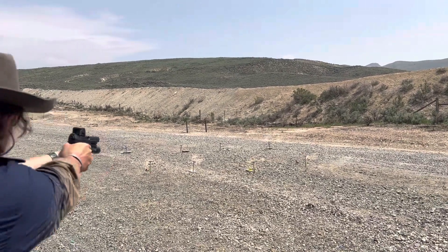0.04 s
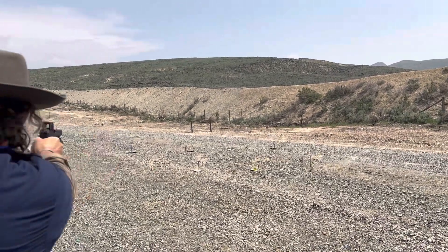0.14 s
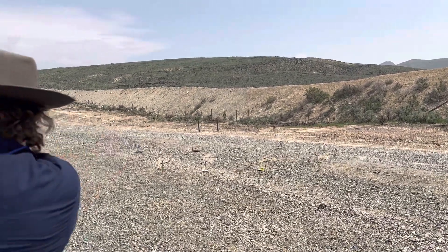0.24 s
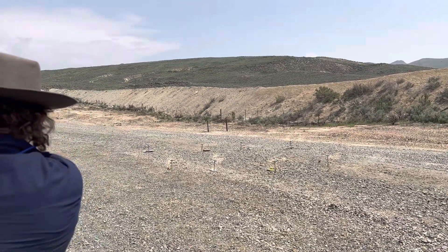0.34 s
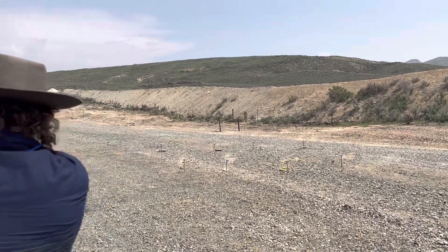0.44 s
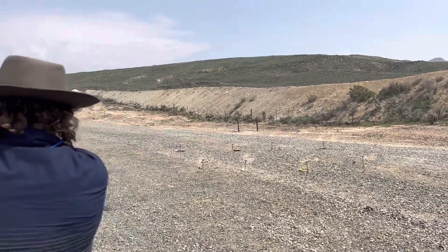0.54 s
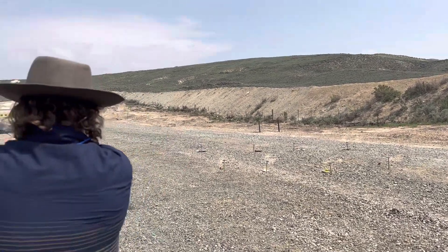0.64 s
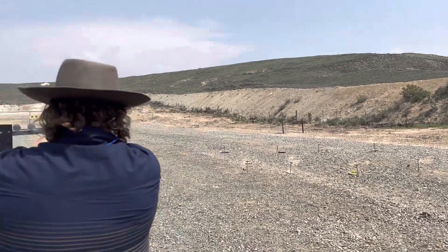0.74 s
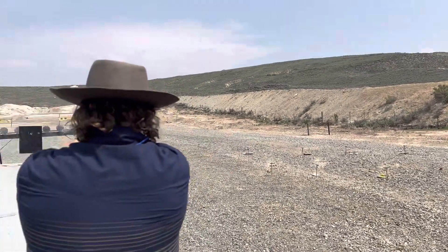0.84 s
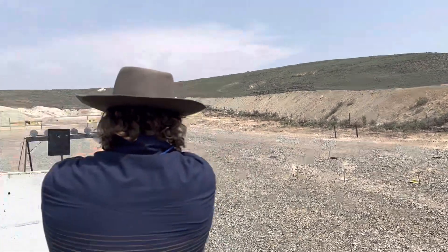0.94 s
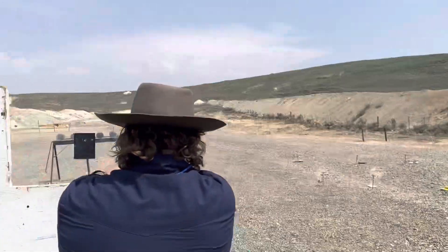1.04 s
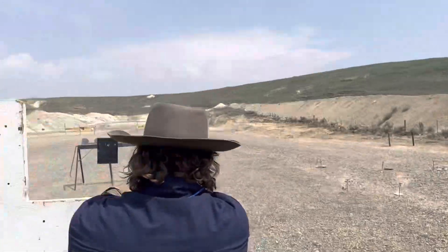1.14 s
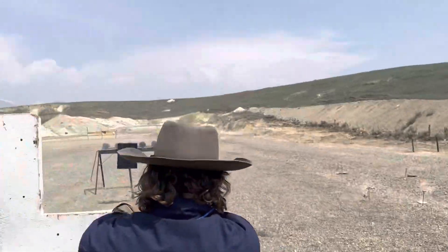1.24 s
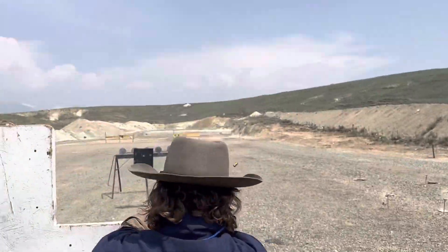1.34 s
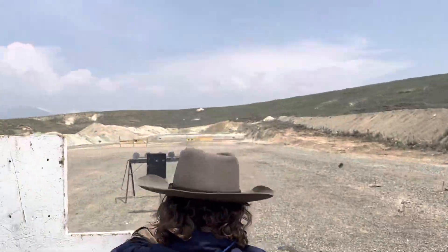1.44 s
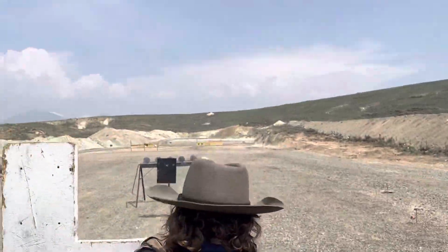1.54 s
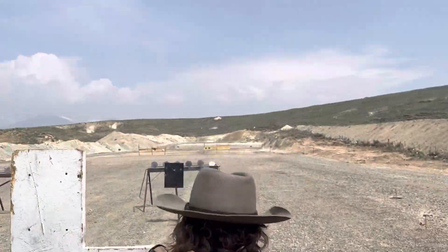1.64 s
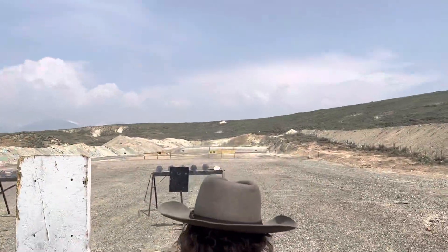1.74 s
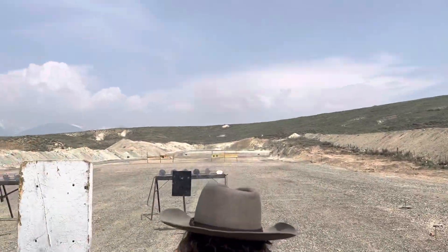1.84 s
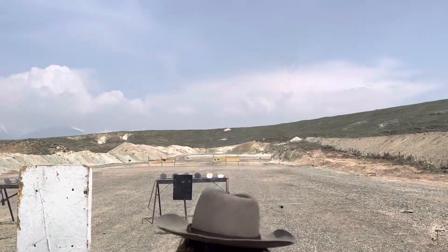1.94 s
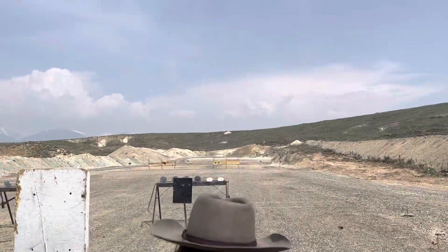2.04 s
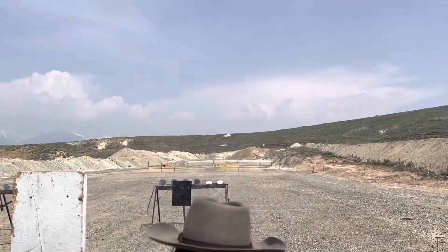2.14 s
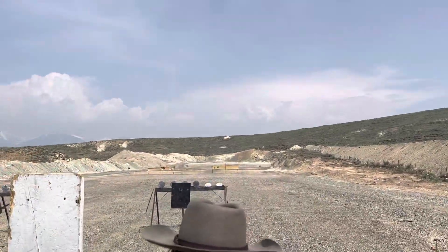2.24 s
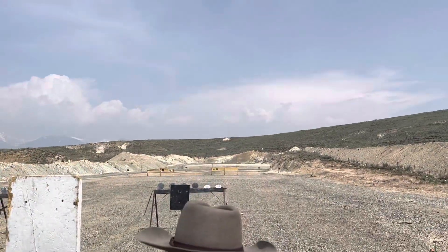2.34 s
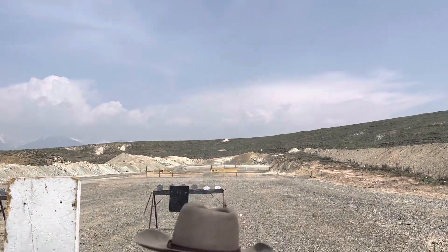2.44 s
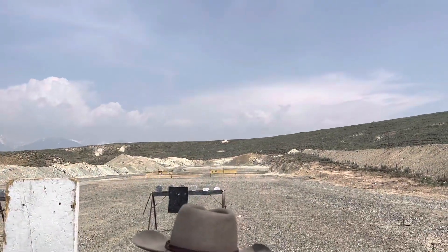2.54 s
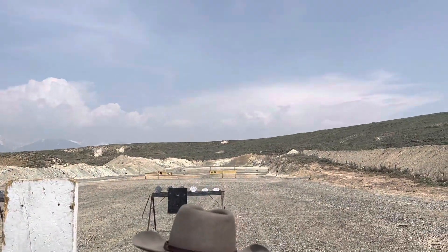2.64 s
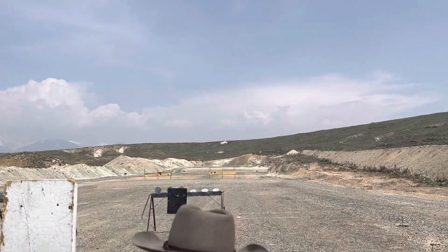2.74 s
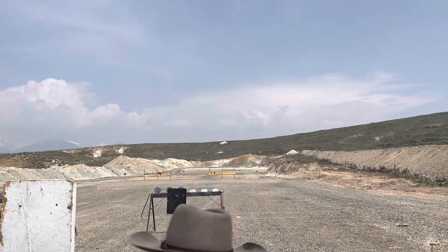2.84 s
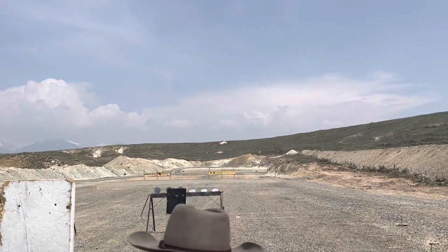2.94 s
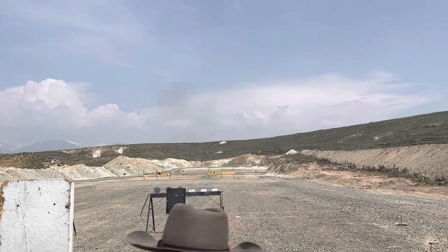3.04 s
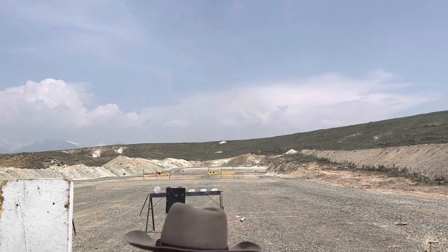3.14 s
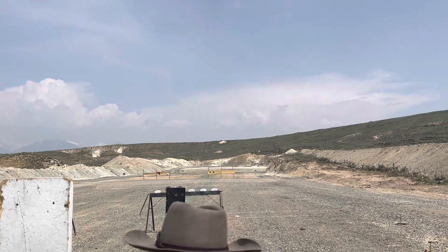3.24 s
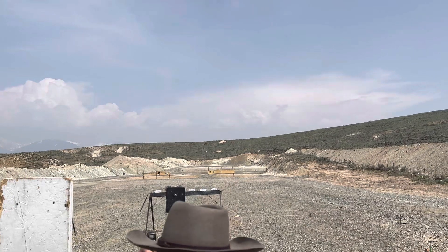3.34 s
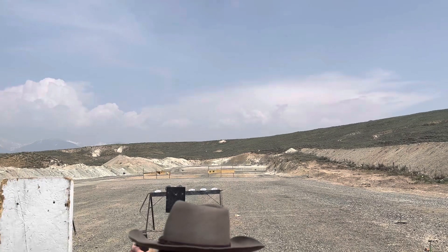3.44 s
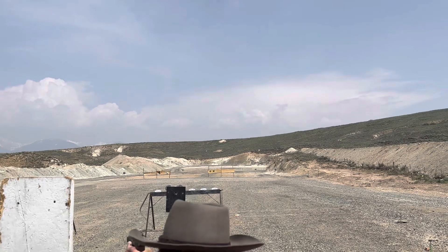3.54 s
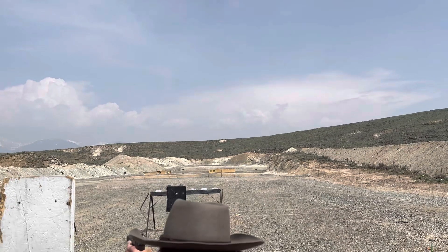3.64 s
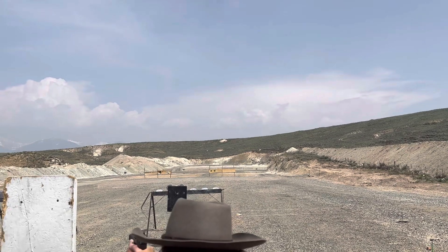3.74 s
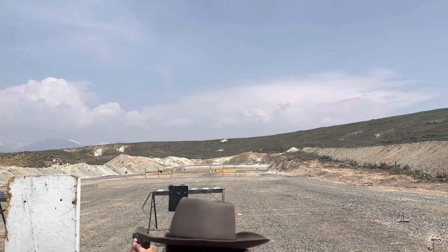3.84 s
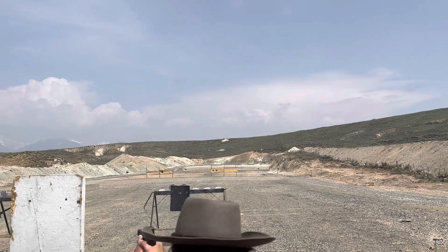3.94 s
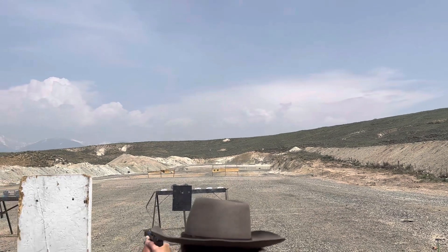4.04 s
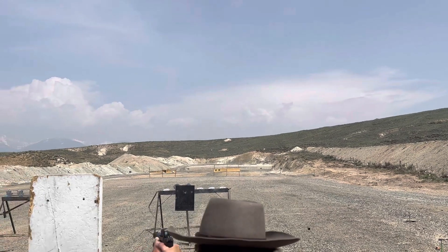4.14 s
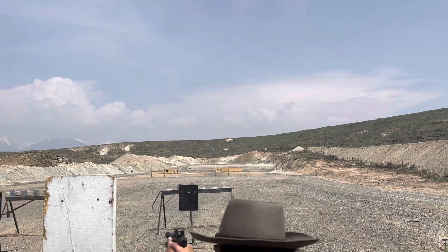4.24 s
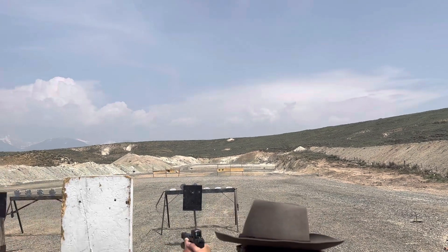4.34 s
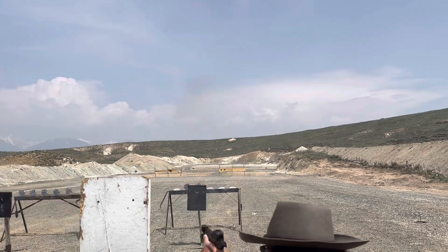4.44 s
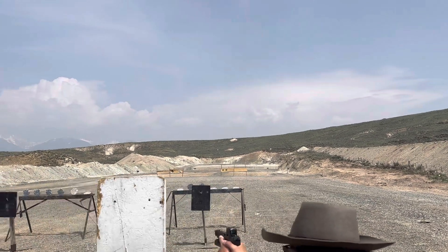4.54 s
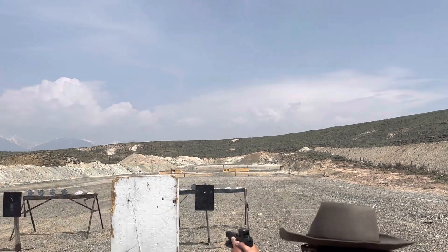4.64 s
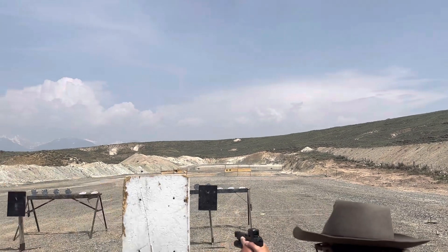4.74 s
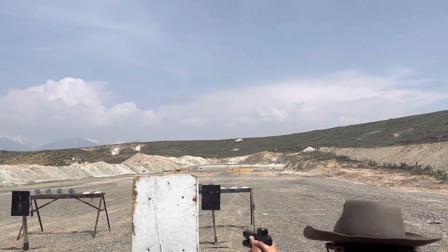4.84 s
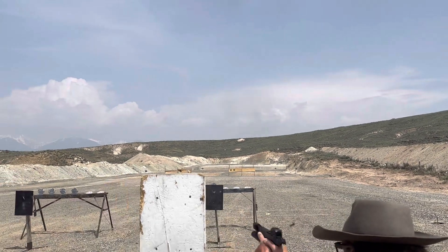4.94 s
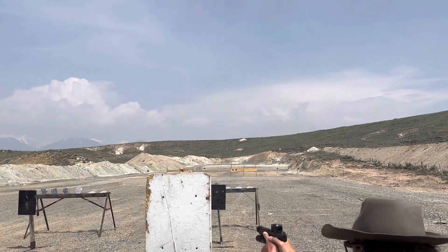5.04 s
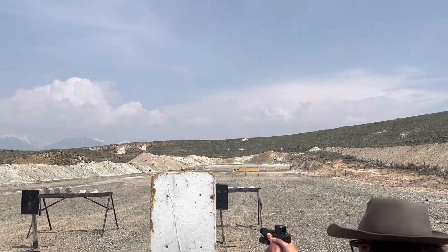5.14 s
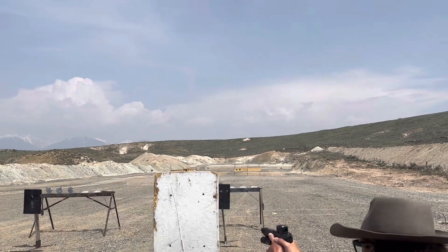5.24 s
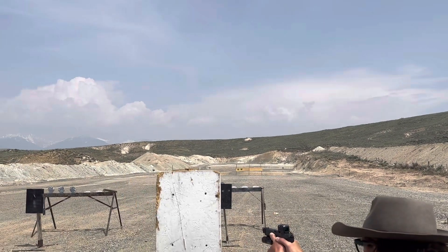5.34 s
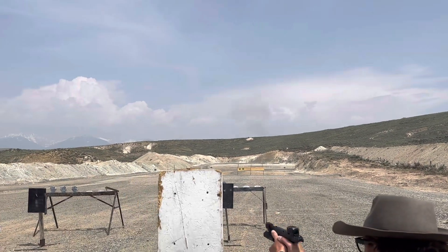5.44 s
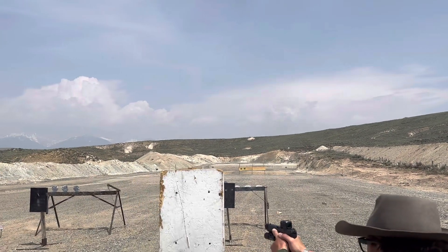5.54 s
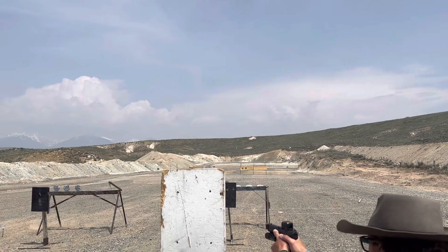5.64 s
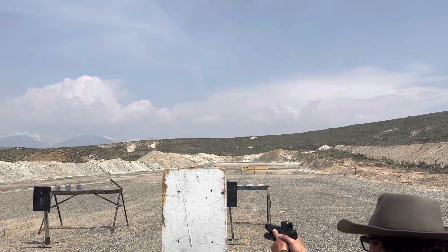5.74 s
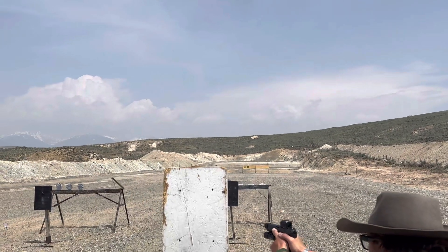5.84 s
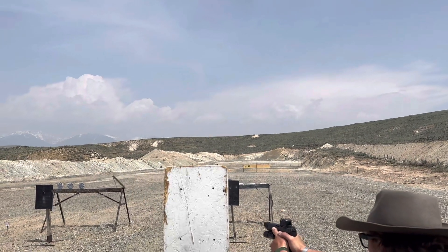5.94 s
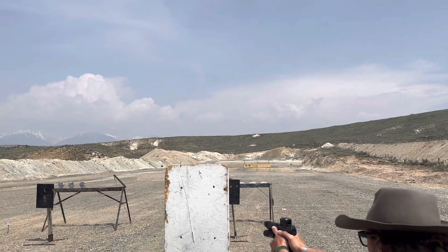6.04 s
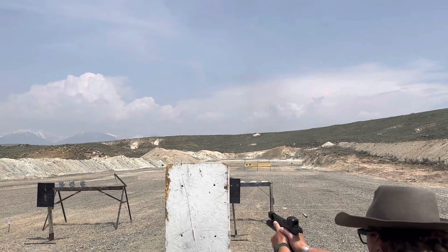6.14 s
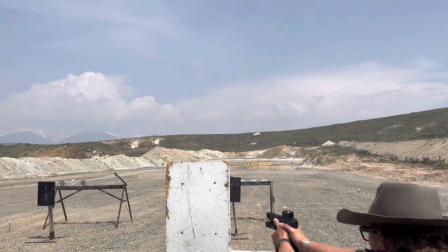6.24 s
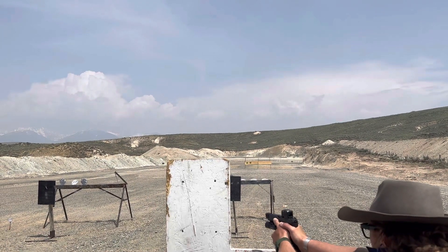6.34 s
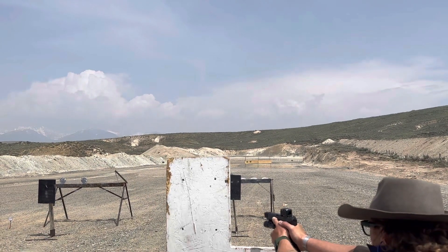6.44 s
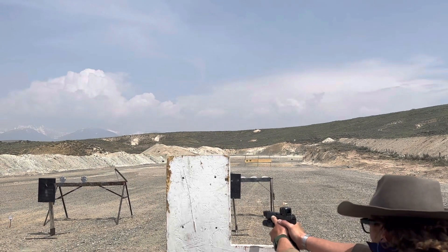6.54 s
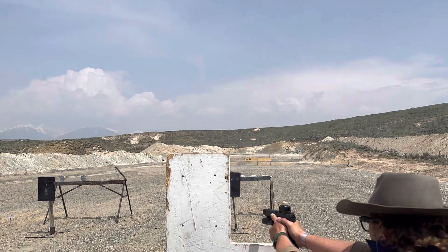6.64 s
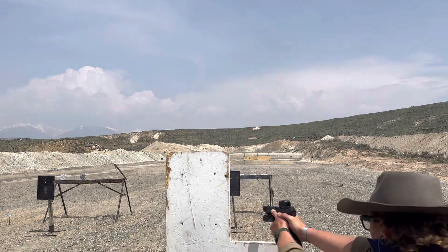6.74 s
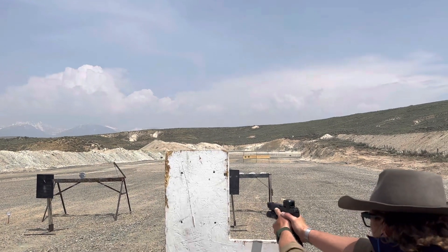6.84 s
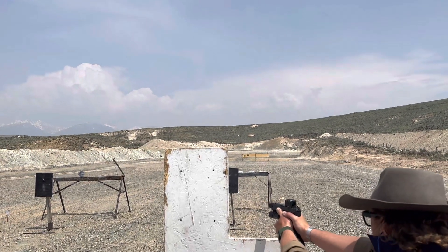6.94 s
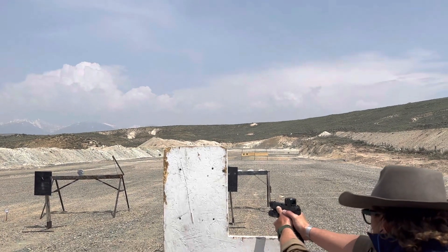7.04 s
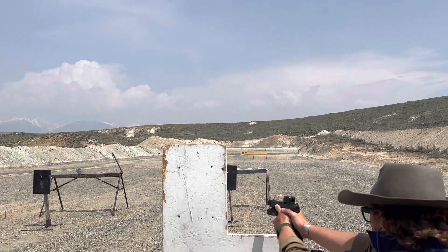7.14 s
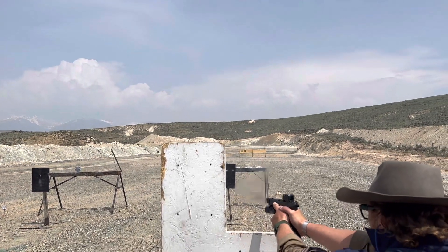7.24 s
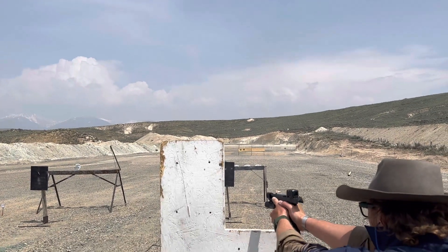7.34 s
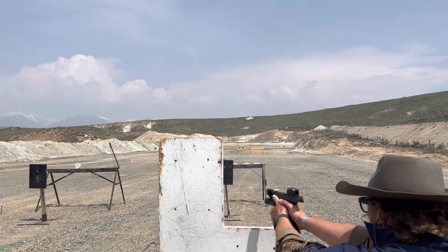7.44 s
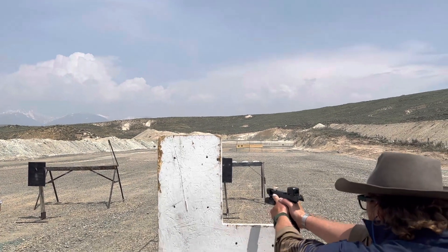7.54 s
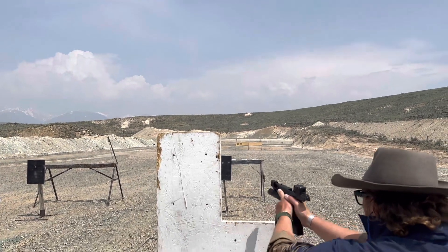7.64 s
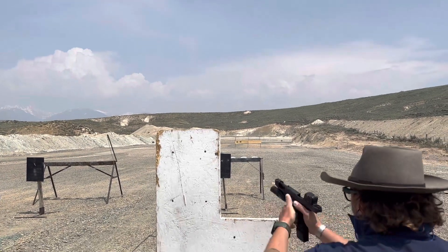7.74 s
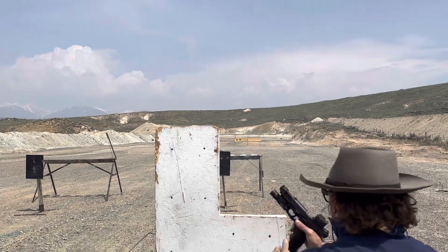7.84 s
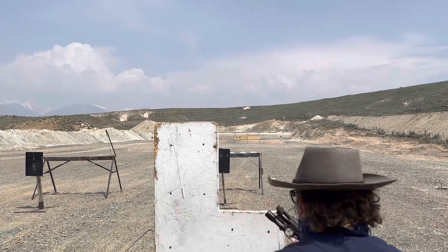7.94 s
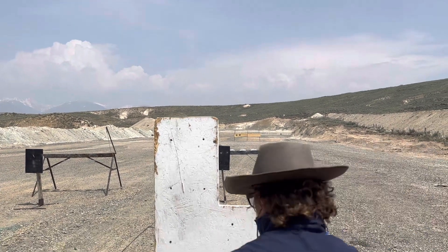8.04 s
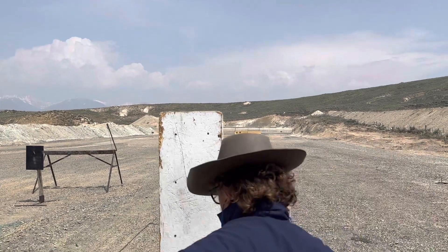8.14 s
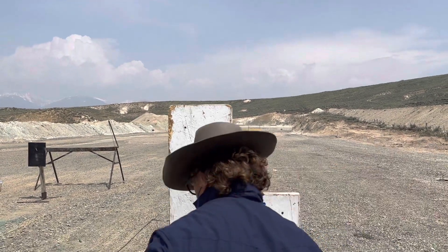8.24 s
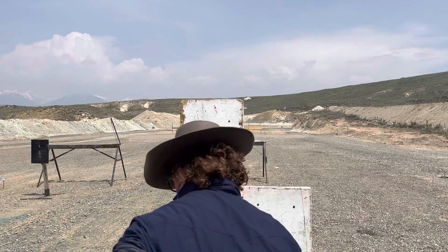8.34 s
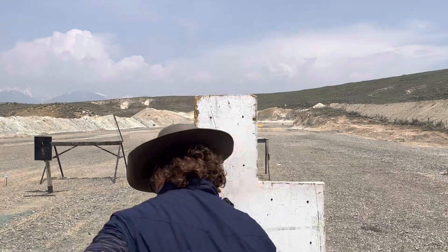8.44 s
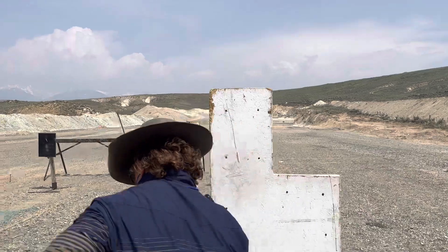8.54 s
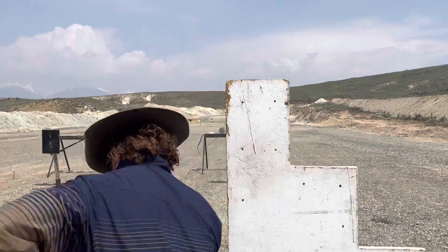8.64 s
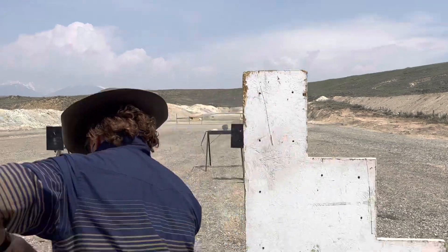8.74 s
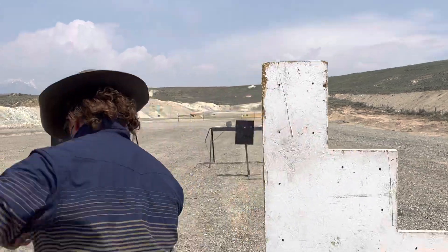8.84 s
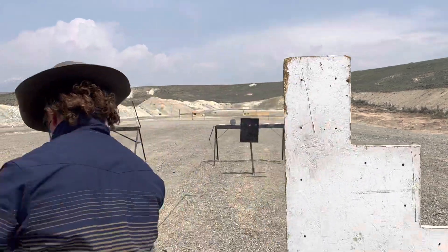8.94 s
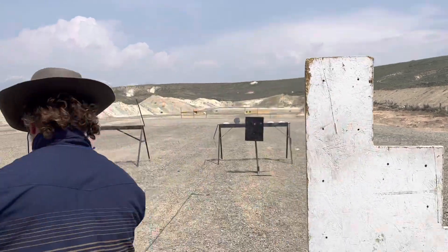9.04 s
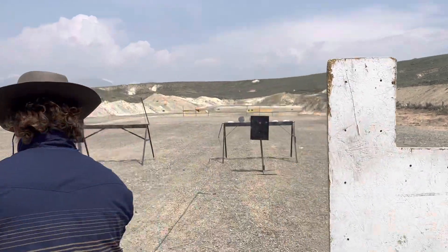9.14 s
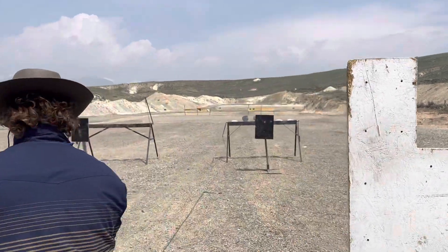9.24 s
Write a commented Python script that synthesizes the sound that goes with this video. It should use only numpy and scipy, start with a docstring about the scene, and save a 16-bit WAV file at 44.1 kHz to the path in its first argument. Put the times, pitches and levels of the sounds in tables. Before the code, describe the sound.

Eleven spaced pistol shots crack across an open gravel range, each answered by a steel plate's bright ping and dull echoes, then gravel footsteps in wind.

```python
"""A pistol fires eleven times on an open gravel range: filtered pulses and gas noise, then a decaying noise tail.
Earth banks and racks return each blast as low-passed thuds and short scattered snaps.
Bullets crack on small steel plates, which ring as fading modes, then fall back as knocks in broad resonances.
A spent case tinkles; boots and clothes stir the gravel as granular noise, mostly before and after the shots.
Wind buffets the microphone as gusting bands of noise, over a faint air hiss."""
import sys
import numpy as np
from scipy import signal
from scipy.fft import rfft, irfft, next_fast_len
from scipy.io import wavfile
from scipy.ndimage import uniform_filter1d

SR = 44100
rng = np.random.default_rng(int(sys.argv[2]) if len(sys.argv) > 2 else 0)


def pcm_store(signal):
    """Save signal as 16-bit PCM."""
    levels = np.round(np.clip(np.atleast_2d(signal), -1, 1) * 32767)
    wavfile.write(sys.argv[1], SR, levels.astype(np.int16).T)


N = 410115

# Shots: t/s, relative blast level/dB, muzzle swing left of the first plate/degree,
# relative bass level (blast and board)/dB, rack thud level/dB
SHOTS = [(1.266, -4.5, -1, -3.5, -28.5), (1.801, -4, 3, -1.5, -24), (2.351, -5.5, 2, -17, -25.5),
         (3.010, -5.5, -1.5, 4.5, -5), (3.873, -3, 8, 0, -10.5), (4.402, -4, 14, -2, -18),
         (4.905, -3, 20.5, 2, -6.5), (5.423, -3.5, 22.5, -6.5, -7.5), (6.103, -5, 17.5, -1, -7),
         (6.644, -5.5, 17, 0, -16.5), (7.241, -5, 19, -8.5, -24.5)]
BASS_SHARE = 0.53  # part of the bass column applied to the blast below 200 Hz
# Direct pulse and reflections from shooter and barricade: nominal delay/ms, nominal level/dB
NEAR_REFLECTIONS = [(0, 0), (4.0, 2), (6.5, -3.5), (8.5, -1.5), (11.5, -13.5)]
# Spectral shape of the blast: f/Hz, relative level/dB
BLAST_SPECTRUM = [(35, -6), (100, 3.5), (250, -5), (500, -9.5), (1000, -11), (2000, -20), (5000, -26),
                  (10000, -35.5), (16000, -33.5)]
# Bands of the scattered tail: centre f/Hz, relative level/dB, t60/s
TAIL_BANDS = [(123, -1, 0.22), (430, -7, 0.65), (1006, 2, 0.55), (2660, -5.5, 0.81), (7300, 0, 0.18),
              (12000, -12, 0.07)]
GROUND_MS, GROUND_DB = 2.0, -10.5  # the gravel mirrors the whole blast
# Open ground between rack and mound returns little: the dip deepens at this slope, then ends
LULL_SLOPE_S, LULL_END_S, LULL_DB = 0.14, 0.12, -6

# Dependence of each answer on muzzle swing: (level at no swing/dB, slope/dB per degree)
TAIL_AIM, BOARD_AIM = (-33.5, -0.061), (-29, 0.52)
RACK_SNAP_AIM, MOUND_AIM = (-30, -0.56), (-43, -0.091)
SIDE_BANK_AIM, BACKSTOP_SNAP_AIM = (-37.5, -0.81), (-42.5, 0.17)

# Snaps from the side bank: delay after the shot/ms, relative level/dB
SIDE_BANK_SNAPS = [(160, -12.5), (265, -10.5), (280, -13)]
# Snaps from the backstop: delay after the shot/ms, relative level/dB
BACKSTOP_SNAPS = [(221, -5), (233, -10)]
# Dull slaps from earth banks and shaken racks: t/s, peak level/dB
DULL_THUDS = [(1.322, -15.5), (1.453, -26), (1.488, -28.5), (1.859, -22), (2.059, -31.5), (2.407, -22),
              (3.231, -21), (3.27, -25.5), (3.728, -39.5), (4.13, -28.5), (4.468, -19), (4.647, -32.5),
              (5.153, -25.5), (6.352, -28), (6.861, -24.5)]
RACK_ECHO_MS, MOUND_MS = 45.3, 114
RACK_BOOM_MS, RACK_BOOM_DB = 50, -13  # level relative to the rack thud
HILL_MS, HILL_DB = 402, -39.5  # the far slope returns a soft thud

# Bullets on plates: t/s, crack level/dB, low mode f/Hz, low mode t60/s,
# low, middle and upper mode levels/dB
PLATE_HITS = [(1.323, -19.5, 4440, 0.16, -56, -40, -54), (1.86, -21.5, 4460, 0.67, -46, -42, -58),
              (2.410, -13, 4430, 0.16, -39, -42, -61), (3.07, -19.5, 4500, 0.35, -36, -38, -56.5),
              (3.940, -25.5, 4544, 0.5, -22, -22.5, -56), (4.467, -20, 4460, 0.32, -21, -42, -41),
              (4.969, -24, 4540, 0.55, -33.5, -29, -22), (5.490, -22, 4566, 0.26, -25.5, -37, -61.5),
              (6.172, -21, 4490, 0.12, -26.5, -29.5, -45.5), (6.712, -23.5, 4510, 0.31, -29, -25.5, -47),
              (7.307, -22.5, 4510, 0.094, -16.5, -43.5, -54)]
# Plate modes, three strong then the fine ones: nominal f/Hz, relative level/dB
PLATE_MODES = [(4544, 0), (7545, 0), (8092, 0), (3180, -12), (5010, -13), (10080, -3), (10500, 1),
               (11560, -3), (12200, -2), (12830, -8), (14200, -7), (14780, -5), (15080, -8)]
STRONG_T60_S, FINE_T60_S = 0.44, .21  # middle and upper strong modes; fine modes
FINE_MODES_DB = -13  # relative to the loudest strong mode
WOBBLE_DB = 3.5  # spread of each ringing tone's level
# Modes of the rack's bar: f/Hz, relative level/dB, t60/s
RACK_MODES = [(2449, -7, 1.5), (2676, -1, 1.0), (3967, 2, .9), (6449, -6, 1.1), (6638, -3, .9),
              (7806, -4, .6), (12120, 0, .9), (12890, -8, .6), (13330, -8, .6)]
RACK_S, RACK_DB = 5.491, -43.5  # splinters of one bullet strike the bar

# Plates falling back and rattling: t/s, relative level/dB, Gaussian decay length/s
PLATE_FALLS = [(2.155, -55, 0.021), (2.257, -62.5, 0.18), (2.751, -53.5, 0.067), (2.857, -60, 0.11),
               (3.269, -53.5, 0.074), (4.16, -49.5, 0.11), (4.689, -47.5, 0.072), (4.797, -56.5, 0.41),
               (5.187, -52.5, 0.49), (6.468, -50, 0.19), (6.952, -51, 0.09), (7.617, -47, 0.12),
               (7.779, -54, 0.067)]
# Resonances of plate and rack: nominal centre f/Hz, half width/Hz, relative level/dB
FALL_RESONANCES = [(1410, 160, 13), (2310, 55, 15.5), (3230, 110, 19), (4430, 140, 19), (5010, 110, 15.5),
                   (5940, 90, 10.5), (7560, 70, 7.5)]

# Spent case landing on stones: t/s, relative level/dB, ring f/Hz
SPENT_CASES = [(.394, -48, 10770)]
# Boots and clothes moving on the gravel: t/s, relative level/dB, swell length/s
GRAVEL_STEPS = [(0.663, -56.5, 0.049), (0.77, -63, 0.06), (3.73, -62.5, 0.014), (8.39, -54.5, 0.0087),
                (8.45, -53, 0.092), (8.569, -53.5, 0.036), (8.658, -44, 0.021), (8.72, -54, 0.11),
                (8.819, -41.5, 0.0079), (8.94, -53.5, 0.19), (9.07, -60, 0.024), (9.196, -59.5, 0.072)]
# Spectral weighting of the gravel grains: f/Hz, relative level/dB
GRIT_SPECTRUM = [(400, -7.5), (1000, -4.5), (2300, -12.5), (4500, -21.5), (13000, -17.5), (16000, -46)]

# Gust strength: t/s, gust level/dB
WIND_GUSTS = [(0, -59), (.3, -53), (.65, -58), (.98, -72), (1.451, -57), (2.899, -65.5), (3.697, -58),
              (5.997, -67), (6.299, -60.5), (7.899, -64.5), (8.2, -61), (8.501, -54), (8.739, -51),
              (9.15, -53.5), (9.3, -46.5)]
# Wind noise bands: f/Hz, relative level/dB, response to gusts/(dB per dB)
WIND_BANDS = [(46.6, -3.5, 1.1), (86.55, 3.0, 1.1), (170.0, 1.0, 1.4), (287.0, -4.0, 2.5), (545, -16, 5.4)]
# Spectral shape of the air hiss: f/Hz, relative level/dB
AIR_SPECTRUM = [(300, -10), (1870, -17.5), (4240, -24.5), (16500, -29)]
AIR_DB = -72  # mean level of the hiss


def muzzle_blast(db, bass_db):
    """Impulse radiation: a muzzle pulse and its early reflections in a spray of gas noise."""
    t = np.arange(4096) / SR
    gas = undb(-25.0) * band(noise(4096, 0.98), 250, 15000, order=1) * fade(t, 0.11)
    pulses = np.zeros_like(gas)
    scatter = rng.standard_normal((len(NEAR_REFLECTIONS), 3))
    for (ms, near_db), (shift, across, size) in zip(NEAR_REFLECTIONS, scatter):
        arrival_ms = ms + .3 * shift * (ms > 0)
        # every reflection comes from its own side and meets the two ports at different times
        for port, lag_ms in enumerate((0.17 * across, -.12 * across)):
            i = int(max(arrival_ms + lag_ms, 0) * SR / 1000)
            pulses[port, i] += undb(near_db + 4.6 * size)
    burst = gas + band(pulses, 20, 3500, order=1)  # the body of the blast is dull
    burst += undb(GROUND_DB) * np.roll(burst, int(GROUND_MS * SR / 1000), axis=1)
    spectrum = [(hz, part_db + BASS_SHARE * bass_db * (hz < 200)) for hz, part_db in BLAST_SPECTRUM]
    burst = colour(burst, spectrum)
    return undb(db + 7.0) * burst / np.abs(burst).max()


def shock_crack(db):
    """Steep wavefront: the front of the shock is a bright, brief crack of noise."""
    burst = noise(512, 0.72) * fade(np.arange(512) / SR, 0.011)
    return undb(db - 8) * band(burst, 1500, 17000, order=1)


def scattered_tail(aim):
    """Diffuse scattering: many small mounds answer, so noise bands decay unevenly at their own rates."""
    t = np.arange(32768) / SR
    lull = undb(LULL_DB * t / LULL_SLOPE_S * (t < LULL_END_S))
    tail = np.zeros((2, len(t)))
    for hz, part_db, t60 in TAIL_BANDS:
        level = undb(aimed(TAIL_AIM, aim) + part_db)
        for lo_hz in (hz / 1.7, hz):
            lumpy = noise(len(t), 250 / hz) * lumps(len(t), 500, 4)
            tail += level * unit(band(lumpy, lo_hz, lo_hz * 1.7)) * fade(t, t60)
    return tail * lull


def board_hum(aim, bass_db):
    """Damped resonance: a board swells into a 51 Hz tone and hums on."""
    t = np.arange(32768) / SR
    envelope = fade(t, 0.8) * (1 - fade(t, 0.018))
    return undb(aimed(BOARD_AIM, aim) + bass_db) * np.sin(2 * np.pi * 51 * t) * envelope


def shots():
    """Superposition: each shot sums its blast, crack, scattered tail and board hum."""
    out = np.zeros((2, N))
    for s, db, aim, bass_db, _ in SHOTS:
        add(out, s, muzzle_blast(db, bass_db))
        add(out, s, shock_crack(db))
        add(out, s + .012, scattered_tail(aim))
        add(out, s + 0.033, board_hum(aim, bass_db))
    return out


def thuds():
    """Low-pass reflection: rack, banks and far slope return dull thuds, as band-limited impulses."""
    out = np.zeros((2, N))
    impulse = np.zeros(2048)
    impulse[0] = 1
    near = band(impulse, 51, 740)
    far = band(impulse, 60, 352, order=3)  # the long way back dulls it
    boom = band(impulse, 56, 100)
    events = [(s, db, far) for s, db in DULL_THUDS]
    for s, _, _, _, rack_db in SHOTS:
        events += [(s + RACK_ECHO_MS / 1000, rack_db, near),
                   (s + RACK_BOOM_MS / 1000, rack_db + RACK_BOOM_DB, boom),
                   (s + HILL_MS / 1000, HILL_DB, far)]
    for s, db, thud in events:
        add(out, s, undb(db) * thud / thud.max())
    return out


def snaps():
    """Scattered reflection: rack, low mound, side bank and backstop return short bursts of noise."""
    out, t = np.zeros((2, N)), np.arange(2048) / SR
    for s, _, aim, _, _ in SHOTS:
        # delay/ms, level/dB, upper band edge/Hz
        events = [(RACK_ECHO_MS, aimed(RACK_SNAP_AIM, aim), 3000), (MOUND_MS, aimed(MOUND_AIM, aim), 1900)]
        events += [(ms, aimed(SIDE_BANK_AIM, aim) + db, 2500) for ms, db in SIDE_BANK_SNAPS]
        events += [(ms, aimed(BACKSTOP_SNAP_AIM, aim) + db, 3300) for ms, db in BACKSTOP_SNAPS]
        for ms, db, top_hz in events:
            burst = noise(2048, 0.67) * fade(t, 0.018) + 2.2 * (t == 0)
            snap = unit(band(burst, top_hz / 4., top_hz, order=3))
            add(out, s + ms / 1000, undb(db) * snap, 2.5)
    return out


def plates():
    """Modal excitation: lead splashes in a crack, then each plate rings, tuned and struck a little differently."""
    out, t = np.zeros((2, N)), np.arange(4096) / SR
    for s, crack_db, low_hz, low_t60, low_db, mid_db, up_db in PLATE_HITS:
        fine_db = max(low_db, mid_db, up_db) + FINE_MODES_DB
        modes = np.column_stack([PLATE_MODES, np.full(len(PLATE_MODES), FINE_T60_S)])
        fine_count = len(modes) - 3
        modes[:3, 2] = STRONG_T60_S
        modes[0, 0], modes[0, 2] = low_hz, low_t60
        modes[3:, 0] *= 1 + .008 * rng.standard_normal(fine_count)
        modes[3:, 1] += fine_db + 5 * rng.standard_normal(fine_count)
        modes[:3, 1] += low_db, mid_db, up_db
        # a round plate's modes come in close pairs that beat: the low and middle modes get twins
        twins = modes[:2] * (1.003, 1, .6) - (0, 11, 0)
        splash = unit(band(noise(4096, 0.16), 590, 8500, order=1))
        crack = splash * (fade(t, 0.019) + undb(-20.0) * fade(t, 0.16))
        add(out, s, undb(crack_db) * crack, 4.)
        add(out, s, ring(np.vstack([modes, twins])), 4.)
    return out


def rack_bar():
    """Modal excitation: bullet splinters set the rack's bar ringing once."""
    out = np.zeros((2, N))
    add(out, RACK_S, undb(RACK_DB) * ring(RACK_MODES), 3.)
    return out


def falls():
    """Forced resonance: dense uneven knocks excite the broad resonances of plate and rack."""
    out, t = np.zeros((2, N)), np.arange(SR // 2) / SR
    for s, db, length in PLATE_FALLS:
        knocks = noise(len(t), .6) * lumps(len(t), 200, 3.5)
        tune = 1 + .025 * rng.standard_normal()  # each plate lands its own way
        body = np.zeros((2, len(t)))
        for hz, half_width, part_db in FALL_RESONANCES:
            body += undb(part_db) * unit(band(knocks, tune * hz - half_width, tune * hz + half_width))
        rattle = unit(body) + 0.63 * unit(band(knocks, 700, 7000, order=1))
        add(out, s, undb(db) * rattle * np.exp(-(t / length) ** 2), 2.5)
    return out


def spent_case():
    """Impact and beating: a brass case strikes stones with a click and two close ringing tones."""
    out, t = np.zeros((2, N)), np.arange(SR // 4) / SR
    for s, db, hz in SPENT_CASES:
        add(out, s, ring([(hz, db, .2), (hz * .991, db - 10, .22)], lag_s=1e-5))
        add(out, s, undb(db) * band(noise(len(t), 0.31), 2800, 17000) * fade(t, 0.0075))
    return out


def gravel():
    """Granular friction: gravel crunches in showers of grains that swell fast and die away."""
    out, t = np.zeros((2, N)), np.arange(SR // 4) / SR
    for s, db, length in GRAVEL_STEPS:
        grains = np.zeros((2, len(t)))
        # coarse to fine stones, an octave each, crunch at their own moments
        for hz in 400 * 2 ** np.arange(6):
            rub = noise(len(t), 0.49) * lumps(len(t), 260, 4.2)
            clicks = (rng.random(len(t)) < .015) * undb(3.3 * rng.exponential(size=len(t)))
            grains += band(rub * (0.34 + clicks), hz, 2 * hz) * undb(3 * rng.standard_normal())
        swell = (1 - np.exp(-t / (.15 * length))) * np.exp(-(t / length) ** 2)
        add(out, s, undb(db) * unit(colour(grains, GRIT_SPECTRUM)) * swell)
    return out


def wind():
    """Turbulent pressure: gusts buffet the microphone, and a stronger gust reaches higher."""
    gust_db = np.interp(np.arange(N) / SR, *np.transpose(WIND_GUSTS))
    flutter_db = 3.5 * walk(40)  # shared by all bands
    out = np.zeros((2, N))
    for hz, db, reach in WIND_BANDS:
        level_db = db - 48.0 + reach * (gust_db + 51.0) + flutter_db + 3.2 * walk(hz / 8)
        out += undb(level_db) * unit(band(noise(N, 0.89), hz / 1.4, hz * 1.248))
    return out


def air_hiss():
    """Stationary broadband noise: a faint hiss, slowly varying in level, lies under all."""
    return undb(AIR_DB + 2 * walk(0.67)) * unit(colour(noise(N, 0.28), AIR_SPECTRUM))


def ring(modes, lag_s=4.3e-5):
    """Modal superposition: fading, wavering tones from one side reach the right port a little late."""
    hz, db, t60 = np.transpose(modes)[:, :, None]
    t = np.arange(int(min(t60.max(), .7) * SR)) / SR
    phase = 2 * np.pi * rng.random(hz.shape)
    wobble = signal.resample(rng.standard_normal((len(hz), 40)), len(t), axis=1)
    onset = np.minimum(t / 0.082, 1)  # the wavering grows from nothing
    size = undb(db + WOBBLE_DB * wobble * onset) * fade(t, t60)
    ports = [np.sum(size * np.sin(2 * np.pi * hz * (t - lag) + phase), axis=0) for lag in (0, lag_s)]
    return np.array(ports)


def aimed(rule, aim):
    """Directivity: the level of an answer is linear in dB with the swing of the muzzle."""
    return rule[0] + rule[1] * aim


def noise(size, alike):
    """Interchannel correlation: mid and side noise mixed to a given likeness."""
    mid, side = rng.standard_normal((2, size))
    alike = np.clip(alike, 0, 1)
    return (np.sqrt(1 + alike) * mid + np.sqrt(1 - alike) * side * np.array([[1], [-1]])) / np.sqrt(2)


def lumps(size, hold, spread_db):
    """Random modulation: a gain redrawn every `hold` samples, its steps slightly smoothed."""
    steps = np.repeat(rng.standard_normal(size // hold + 1), hold)[:size]
    return undb(spread_db * uniform_filter1d(steps, hold // 2))


def walk(rate):
    """Slow fluctuation: random levels held 1 / rate seconds and smoothed twice."""
    k = int(SR / rate)
    steps = np.repeat(rng.standard_normal(N // k + 1), k)
    return 1.3 * uniform_filter1d(uniform_filter1d(steps, k), k)[:N]


def colour(x, points):
    """Minimum-phase filtering: a folded cepstrum gives x a causal response through (Hz, dB) points."""
    hz, db = np.transpose(points)
    grid_hz = np.arange(2049) * SR / 4096
    log_gain = np.interp(np.log(grid_hz + 1), np.log(hz), db) * np.log(10) / 20
    cep = irfft(log_gain)
    cep[1:2048] *= 2
    cep[2049:] = 0
    response = irfft(np.exp(rfft(cep)))
    return signal.fftconvolve(x, np.atleast_2d(response), axes=1)[:, :x.shape[1]]


def band(x, lo_hz, hi_hz, order=2):
    """Band-pass filtering with a maximally flat response."""
    edges = [lo_hz, min(hi_hz, .45 * SR)]
    return signal.sosfilt(signal.butter(order, edges, "bandpass", fs=SR, output="sos"), x)


def fade(seconds, t60):
    """Exponential decay: 60 dB lost in t60 seconds."""
    return np.exp(-np.log(1000) * seconds / t60)


def undb(db):
    """Amplitude ratio of a level in dB."""
    return 10 ** (np.asarray(db) / 20)


def unit(x):
    """Normalisation to unit root-mean-square amplitude."""
    return x / np.sqrt(np.mean(x ** 2))


def add(out, s, sound, pan_db=0.):
    """Superposition at s seconds, with a level difference of pan_db toward the left."""
    i = int(s * SR)
    tilt = undb(np.array([[pan_db], [-pan_db]]) / 2)
    piece = (np.atleast_2d(sound) * tilt)[:, :N - i]
    out[:, i:i + piece.shape[1]] += piece


def scene():
    """Linear superposition of all sources at the microphone."""
    blasts = shots() + thuds() + snaps()
    steel = plates() + rack_bar() + falls()
    return blasts + steel + spent_case() + gravel() + wind() + air_hiss()


def record(dry, turns=1.2, low_hz=25.4, drive=0.5, top_hz=16300):
    """Dispersion and saturation: a phone's filters delay low tones more, so bangs chirp down; peaks are rounded."""
    size = next_fast_len(N + SR)
    hz = np.arange(size // 2 + 1) * SR / size
    # group delay is turns / (hz + low_hz) seconds
    smear = np.exp(-2j * np.pi * turns * np.log((hz + low_hz) / low_hz))
    wet = irfft(rfft(dry, size) * smear, size)[:, :N]
    wet = signal.sosfilt(signal.butter(4, 38, "highpass", fs=SR, output="sos"), wet)
    rounded = np.tanh(drive * wet) / drive
    return signal.sosfilt(signal.ellip(10, .2, 90, top_hz, fs=SR, output="sos"), rounded)


dry = scene()
out = record(dry)
pcm_store(out)
```